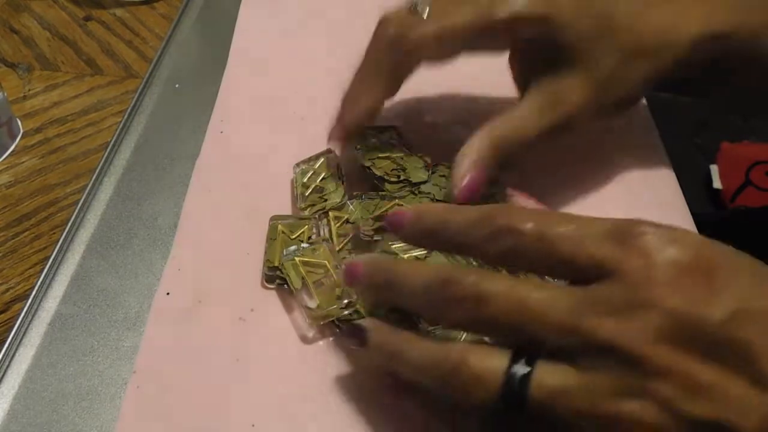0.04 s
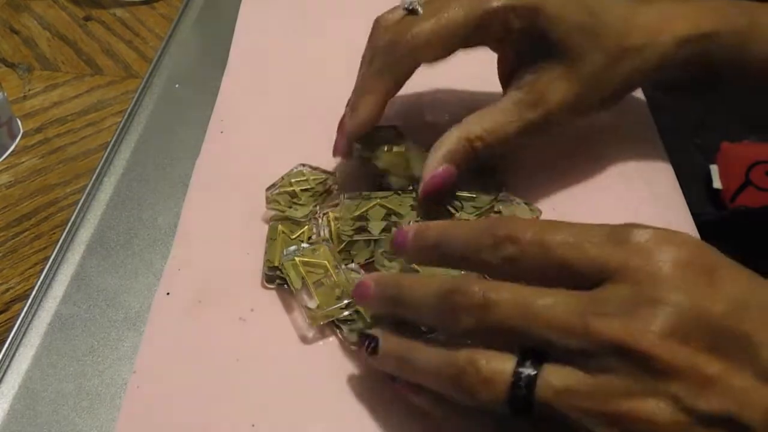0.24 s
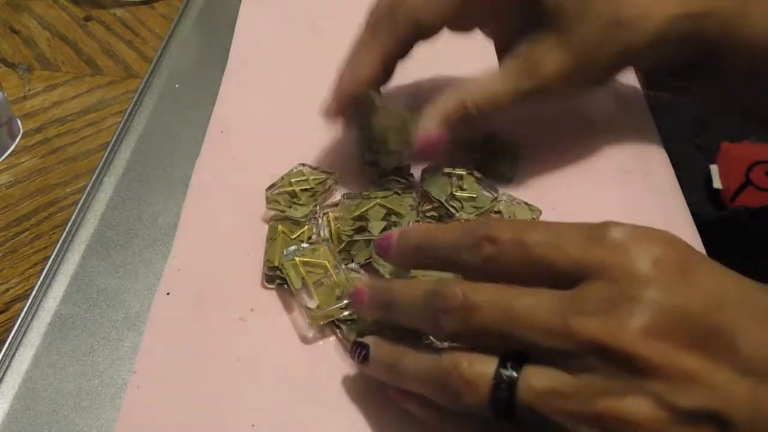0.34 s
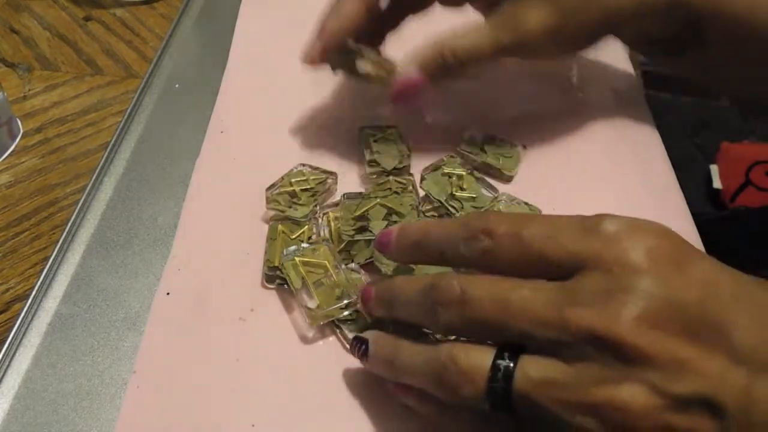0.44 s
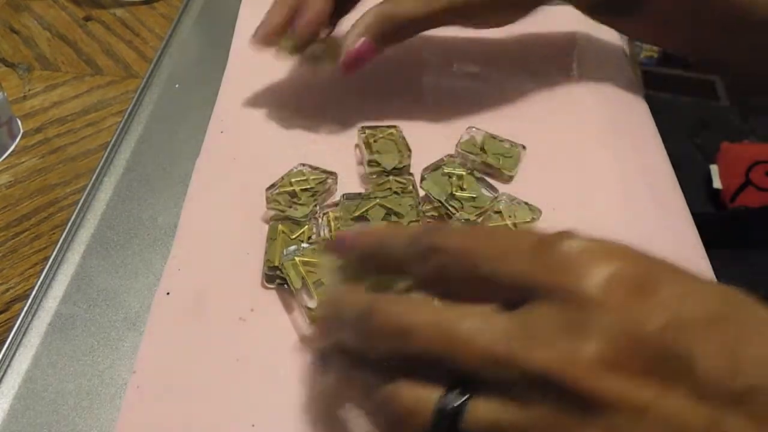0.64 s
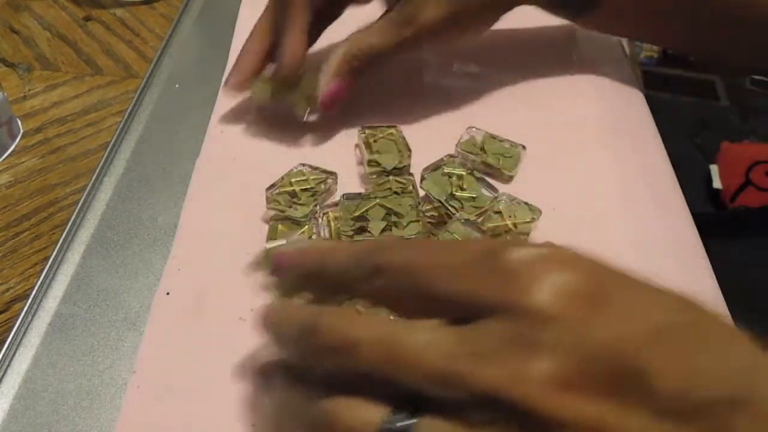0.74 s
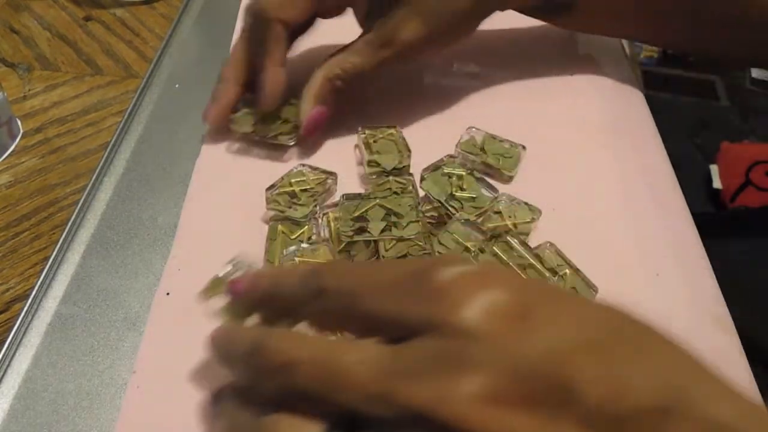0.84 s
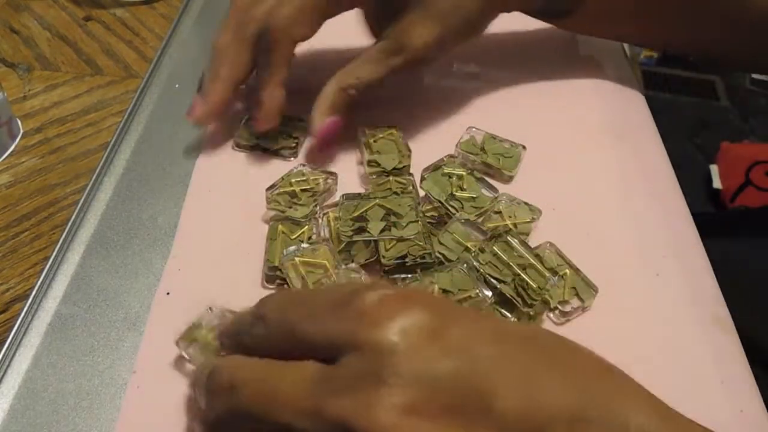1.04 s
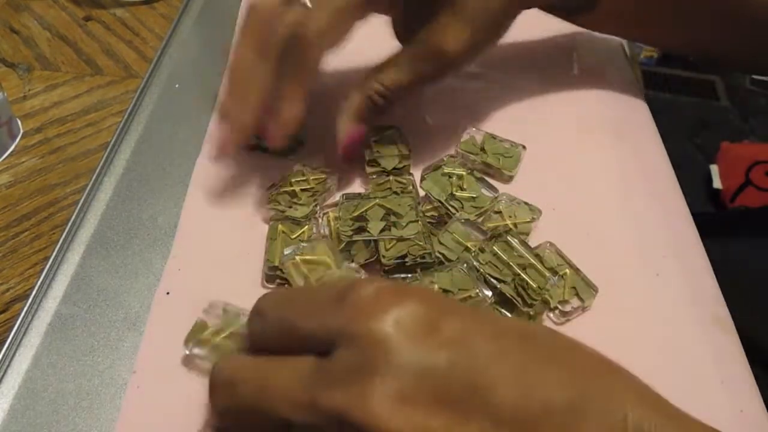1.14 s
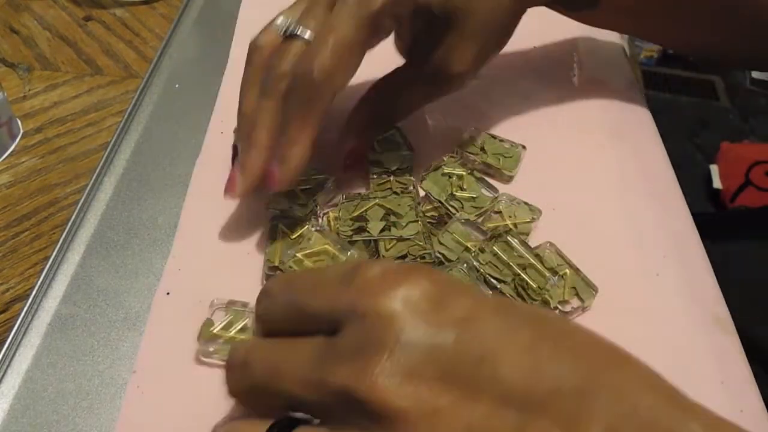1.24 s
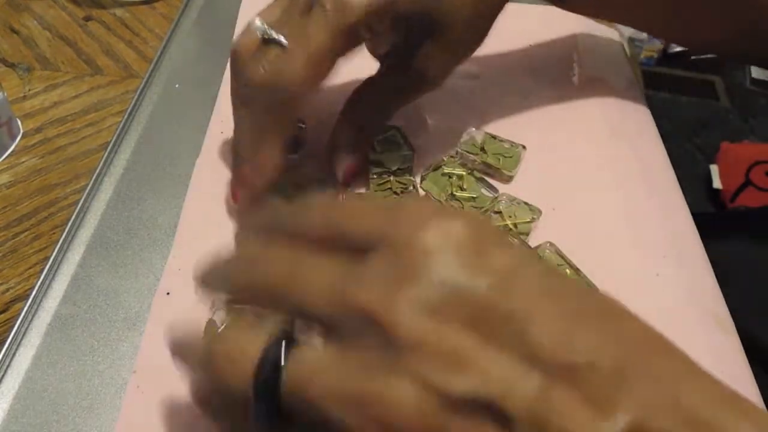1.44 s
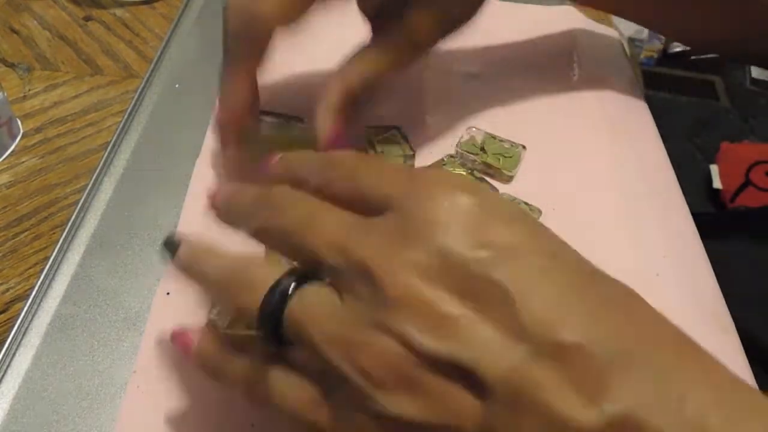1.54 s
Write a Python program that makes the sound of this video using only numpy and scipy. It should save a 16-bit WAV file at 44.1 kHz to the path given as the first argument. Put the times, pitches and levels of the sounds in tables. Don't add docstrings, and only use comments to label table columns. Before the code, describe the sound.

Small hard stones clatter and knock on a padded table, close up, over steady low air hum.

```python
import sys
import numpy as np
from scipy import signal
from scipy.fft import rfft, irfft
from scipy.io import wavfile
from scipy.ndimage import uniform_filter1d

SR = 44100
rng = np.random.default_rng(int(sys.argv[2]) if len(sys.argv) > 2 else 0)


def unload_audio(sound):
    columns = np.transpose(np.atleast_2d(sound))
    steps = np.round(np.clip(columns, -1, 1) * 32767)
    wavfile.write(sys.argv[1], SR, steps.astype(np.int16))


def boost(x):
    u = np.asarray(x, float) / 20
    return 10 ** u


N = 70560


def curve(table, hz):
    table = np.array(table, float)
    return np.interp(np.log(hz), np.log(table[:, 0] + 1), table[:, 1])


def band(x, hz, width):
    edges = np.clip([hz - width / 2, hz + width / 2], 10, SR / 2 - 500)
    return signal.sosfilt(signal.butter(2, edges, "band", fs=SR, output="sos"), x)


def unit(x):
    return x / np.sqrt(np.mean(x ** 2))


def smooth_twice(x, first, second):
    return uniform_filter1d(uniform_filter1d(x, first), second)


def walk(rate):
    hold = int(SR / rate)
    steps = np.repeat(rng.standard_normal(N // hold + 1), hold)
    return unit(smooth_twice(steps, hold, hold)[:N])


def decay(t, t60):
    return np.exp(-np.log(1000) * t / t60)


LONGEST_T60_S = .18
RATTLE_HZ, RATTLE_WIDTH_HZ, RATTLE_T60_S = 1824, 2750, .18


def ring(start, hz, db, t60, pan_db, push=.1, rattle_db=-200):
    t = np.arange(int(.25 * SR)) / SR
    t60 = np.clip(t60, .001, LONGEST_T60_S)[:, None]
    modes = np.sin(2 * np.pi * hz[:, None] * t) * decay(t, t60)
    sign = (-1) ** (np.arange(len(hz)) // 3)
    sides = boost(np.array([pan_db, -pan_db]) / 2)
    pair = (sign * boost(db) * sides) @ modes

    noise = rng.standard_normal((3, len(t)))
    rattle = band(noise[0] + 0.96 * noise[1:], RATTLE_HZ, RATTLE_WIDTH_HZ)
    pair = pair + boost(rattle_db) * rattle * decay(t, RATTLE_T60_S)

    a = np.exp(-2 / push)
    pair = signal.lfilter([(1 - a) ** 2], [1, -2 * a, a * a], pair)
    out = np.zeros((2, N))
    i = int(start * SR)
    out[:, i:i + len(t)] = pair[:, :N - i]
    return out


# (frequency [Hz], level [dB per Hz])
AIR_SPECTRUM = [(45, -5), (90, -3), (220, -6), (650, -3.5), (1300, -6.5), (2500, -16.5), (5000, -30),
                (16000, -38)]
# (frequency [Hz], side minus mid [dB])
AIR_WIDTH = [(60, -12), (250, -9.5), (700, -7.5), (1300, -3), (2400, -0.5), (8000, 1), (15000, 3)]
AIR_DB, SWELL_DB, FLICKER_DB = -57.5, .4, 1.2


def air():
    f = np.maximum(np.arange(N // 2 + 1) * SR / N, 1)
    mid, side = rfft(rng.standard_normal((2, N))) * boost(curve(AIR_SPECTRUM, f))
    side = side * boost(curve(AIR_WIDTH, f))
    swell = walk(1.33)
    out = 0
    for hz in 20 * 2 ** np.arange(0, 10.1, .5):
        weight = np.clip(1 - np.abs(2 * np.log2(f / hz)), 0, 1)
        flicker = walk(12.25) * (hz < 3000)
        sway = boost(SWELL_DB * swell + FLICKER_DB * flicker)
        out = out + sway * irfft(np.array([mid, side]) * weight, N)
    mid, side = out / np.sqrt(np.mean(out[0] ** 2)) * boost(AIR_DB)
    return np.array([mid + side, mid - side]) * boost(np.array([[.4], [-.4]]))


# (time [s], level [dB], pitch [Hz], ring [ms])
TOUCHES = [(0.086, -38, 3440, 3.9), (0.118, -37.5, 5300, 2.6), (.1765, -56, 2600, 3.3),
           (.1492, -49, 11800, 1.4), (.1545, -29.5, 11300, 0.99), (.2, -48, 6950, 3.4),
           (0.2048, -38, 2750, 7.2), (0.2203, -36, 2380, 5.6), (0.2325, -39, 7900, 1.9),
           (.278, -49.5, 4900, 2.5), (.528, -45, 4000, 4.7), (.831, -56, 9100, 2.8),
           (0.855, -46.5, 4000, 2.8), (0.92, -55, 6720, 4), (.967, -50.5, 4700, 3),
           (1.001, -45.5, 4530, 8.6), (1.012, -49, 8600, 3), (1.034, -52, 8000, 3), (1.203, -45, 2500, 2.4),
           (1.21, -42.5, 2120, 6.5), (0.1494, -26.5, 2650, 1.2), (0.1539, -30.5, 2800, 6)]
# (ratio to pitch [1], level [dB])
STONE_OVERTONES = [(.8, 10), (1, 13.5), (1.2, 2), (1.45, -34), (1.71, -21), (2, -13), (2.4, -32),
                   (3.1, -28)]
TICK_DB, CRUNCH_DB = -29, -4
CRUNCH_REACH = 1.7


def ticks():
    ratio, db = np.array(STONE_OVERTONES, float).T
    chance = rng.standard_normal((len(TOUCHES), 3, len(ratio)))
    noise = rng.standard_normal((3, N))
    noise = noise[0] + 1.3 * noise[1:]
    out = 0
    for (start, level, hz, ms), (detune, uneven, pan) in zip(TOUCHES, chance):
        modes_hz = np.minimum(hz * ratio * (1 + .05 * detune), 15500)
        t60 = 2.5 * ms / 1000 / np.sqrt(ratio)
        out = out + ring(start, modes_hz, level + TICK_DB + db + 3 * uneven, t60, 3 * pan)

        u = np.maximum(np.arange(N) / SR - start, 0) / (0.17 * ms / 1000)
        edges = [.5 * hz, min(CRUNCH_REACH * hz, 20000)]
        crunch = unit(signal.lfilter(*signal.butter(1, edges, "band", fs=SR), noise))
        out = out + boost(level + CRUNCH_DB) * np.sqrt(u) * np.exp(-u) * crunch
    return out


# (time [s], level [dB], contact [ms], upper modes [dB], share of the free ring time [1])
LANDINGS = [(.0865, -41.5, 1.04, 4, .9), (.0915, -46.5, 0.45, -16, 0.57), (.107, -50.5, 0.32, -7, 1),
            (.158, -42.5, 0.077, -4, 0.63), (.1745, -43, 0.1, -2.5, 1.1), (.1788, -32, 0.31, -0.5, 0.43),
            (.206, -57, 0.096, 3, .7), (.2115, -41.5, .44, 3.5, 1.5), (0.2202, -33, 0.18, 0.5, 0.59),
            (.227, -29, 0.96, 13.5, .9), (.2318, -41.5, 0.16, 2.5, 1.35), (.238, -26, 0.66, -1, 0.5),
            (.2465, -50, 0.35, 3, 1), (.2545, -47, 0.49, 2, 1.46), (.355, -51, 0.056, -6.5, 0.41),
            (.4225, -42, 0.31, 4, .9), (.429, -31.5, 0.55, 3, 1), (.53, -44.5, .4, -1, 0.82),
            (.597, -56.5, 0.57, 15.5, 0.97), (.8187, -34.5, 0.94, 0, 1.5), (.830, -40.5, 0.24, -6, 0.5),
            (.907, -55, 0.18, 1, .9), (.9195, -43, 0.7, 0, 0.82), (.9678, -29, 0.67, -3, 0.74),
            (.9725, -34, 0.41, 5, 1.1), (.9765, -36.5, 0.55, -0.5, 2.1), (.982, -28, 0.84, 0, 0.58),
            (1.0035, -26.5, 0.51, 5, 0.61), (1.009, -27.5, 0.54, -1, 0.33),
            (1.0145, -22.5, 0.54, -0.5, 0.72), (1.031, -50, 0.74, 7, 1.2), (1.081, -44.5, 0.42, -5.5, 0.75),
            (1.168, -32, 1.3, -1.5, 0.77), (1.203, -18.5, 0.57, 2.5, 0.38), (1.2075, -20.5, 0.67, 9, 0.54),
            (1.2135, -21.5, 0.63, -5, 0.93), (1.2232, -35.5, 0.36, -3, 1.7),
            (1.2308, -23, 1.08, -0.5, 0.52), (1.2495, -35.5, 1.1, -9.5, 0.69)]
# (frequency [Hz], level [dB], t60 [s], left minus right [dB])
TABLE_MODES = [(209, -16.5, 0.11, -0.5), (248.4, -20.5, 0.14, 1), (380, -8, 0.071, -5.5),
               (460, -3.5, 0.027, -8), (477, 0.5, 0.055, 1.5), (504.2, 0, 0.11, 4.5),
               (616, -9.5, 0.041, -12.5), (752, 5, 0.053, 0.5), (788.6, 4.5, 0.078, 3),
               (887.4, 3, 0.051, 3), (1080, -1.5, 0.013, 3.5), (1185, -4.5, 0.085, 9),
               (1462, -10, 0.049, 14.5), (1982, -1.5, 0.032, 6)]
KNOCK_DB, PLACE_DB, RATTLE_DB = -7, 2.5, -3.5
SPLIT_HZ = 668


def knocks():
    hz, db, t60, pan = np.array(TABLE_MODES, float).T
    places = rng.standard_normal((len(LANDINGS), len(hz)))
    upward = np.tanh((hz - SPLIT_HZ) / 100)
    out = 0
    for (start, level, ms, upper, free), place in zip(LANDINGS, places):
        modes_db = db + KNOCK_DB + level + PLACE_DB * place + upper * upward
        push = max(ms, .02) * SR / 1000
        out = out + ring(start, hz, modes_db, t60 * free, pan, push, level + RATTLE_DB)
    return out


ROOM_DB, ROOM_T60_S, ROOM_TREBLE_T60_S, ROOM_HZ = -10.5, 0.13, 0.068, 2500
ROOM_LIKE, ROOM_RISE_S = .88, .003


def room(x):
    t = np.arange(int(.4 * SR)) / SR
    shared, apart = rng.standard_normal((2, len(t)))
    echoes = np.sqrt(1 + ROOM_LIKE) * shared + np.sqrt(1 - ROOM_LIKE) * apart * np.array([[1], [-1]])
    low = signal.lfilter(*signal.butter(1, ROOM_HZ, fs=SR), echoes)
    tail = low * decay(t, ROOM_T60_S) + (echoes - low) * decay(t, ROOM_TREBLE_T60_S)
    tail = tail * (1 - np.exp(-t / ROOM_RISE_S))
    tail = tail * boost(ROOM_DB) / np.sqrt(np.sum(tail[0] ** 2))
    return signal.fftconvolve(x.mean(axis=0)[None], tail, axes=1)[:, :N]


# (start [s], end [s], level [dB])
DRAGS = [
    (0.113, 0.28, -50),
    (0.5, 0.637, -79),
    (0.845, 1.138, -55),
    (1.18, 1.407, -59),
]
SLIDE_HZ, SLIDE_WIDTH_HZ = 635, 480
BUMPS_PER_S, BUMP_SCATTER_DB = 600, 2.5


def slides():
    t = np.arange(N) / SR
    hits = rng.random(N) < BUMPS_PER_S / SR
    bumps = hits * rng.standard_normal(N) * boost(BUMP_SCATTER_DB * rng.exponential(1, N))
    shape = 0
    for start, end, db in DRAGS:
        shape = shape + boost(db) * np.sin(np.pi * np.clip((t - start) / (end - start), 0, 1))
    return shape * unit(band(bumps, SLIDE_HZ, SLIDE_WIDTH_HZ)) * boost(np.array([[1.], [-1.]]))


# (time [s], level [dB], pitch [Hz], t60 [ms])
CLEAR_RINGS = [(.1492, -46, 3800, 4.2), (0.1487, -41, 4800, 5), (0.1498, -46, 7500, 4.7),
               (.1492, -49, 11640, 5.3), (.1492, -50, 15000, 3), (.1545, -38, 3860, 7.5),
               (.1545, -41.5, 6400, 6.3), (0.155, -36.5, 7370, 5.9), (.1545, -40, 11940, 5.8),
               (.1545, -47, 14800, 3.7), (0.2193, -40, 2500, 8.5), (0.2306, -44.5, 2800, 11),
               (0.2305, -50, 4800, 9.4), (.2315, -51.5, 9290, 5), (.9195, -65.5, 6900, 18),
               (.967, -64, 5330, 15), (.9997, -53, 3300, 18), (0.9991, -45.5, 3950, 16),
               (1.0007, -54, 5220, 20), (.9997, -63, 6800, 18), (1.035, -60, 3420, 15),
               (1.2129, -33.5, 1930, 12), (1.2116, -44.5, 2650, 17)]


def pings():
    pans = 5 * rng.standard_normal((len(CLEAR_RINGS), 1))
    out = 0
    for (start, db, hz, ms), pan in zip(CLEAR_RINGS, pans):
        out = out + ring(start, np.array([hz]), db, np.array([ms / 1000]), pan)
    return out


CHIRP_LEN_S, CHIRP_HZ, CHIRP_WIDTH_HZ = .07, 11550, 350
CHIRP_TIMES = [.33, .83, 1.335]
CHIRP_LEVELS = [-80, -82, -79]


def insect():
    t = np.arange(N) / SR
    gate = 0
    for start, db in zip(CHIRP_TIMES, CHIRP_LEVELS):
        to_edge = np.minimum(t - start, start + CHIRP_LEN_S - t)
        gate = gate + boost(db) * np.clip(to_edge / 0.006, 0, 1)
    return gate * unit(band(rng.standard_normal((2, N)), CHIRP_HZ, CHIRP_WIDTH_HZ))


# (frequency [Hz], level [dB], t60 [s], left minus right [dB])
CLACK_MODES = [(244, -31, 0.044, 4), (476, -2.5, 0.061, -1), (721, -2.5, 0.067, 6), (838, 2.5, 0.059, 1),
               (1103, 1.5, 0.019, 7), (1191, -5, 0.22, 2), (1512, -24, 0.32, 21.5), (1729, -16, 0.27, 5),
               (1915, -7.5, 0.079, 8), (2268, -15, 0.099, -21), (2650, -10, 0.069, 7), (2654, -12, 0.13, 4),
               (3120, 15.5, 0.0049, -5), (509, -16, .17, 10)]
CLACK_S, CLACK_DB, CLACK_RATTLE_DB = .3918, -19.5, -15.5
SPRAY_DB, SPRAY_T60_S, SPRAY_HZ = -47.5, 0.092, 4000


def clack():
    hz, db, t60, pan = np.array(CLACK_MODES, float).T
    strike = ring(CLACK_S, hz, db + CLACK_DB, t60, pan, 6.6, CLACK_RATTLE_DB)
    u = np.arange(N) / SR - CLACK_S
    hiss = band(rng.standard_normal((2, N)), 9500, 13000)
    hiss = signal.lfilter(*signal.butter(1, SPRAY_HZ, fs=SR), hiss)
    shape = np.clip(u / 0.0022, 0, 1) * decay(np.abs(u), SPRAY_T60_S)
    return strike + boost(SPRAY_DB) * unit(hiss) * shape


LOW_CUT_HZ, TICK_ROOM_DB = 170, -0.5


def scene():
    low_cut = signal.butter(4, LOW_CUT_HZ, "high", fs=SR, output="sos")
    wood = signal.sosfilt(low_cut, knocks() + slides() + clack())
    small = ticks() + pings()
    return air() + wood + small + room(wood + boost(TICK_ROOM_DB) * small) + insect()


def roll_off(x):
    return signal.sosfilt(signal.butter(12, 16530, fs=SR, output="sos"), x)


HAZE_DB, HAZE_S, HAZE_LOW_HZ = -35.5, 0.041, 2960
TOP_HZ = 15700


def record(dry):
    k = int(HAZE_S * SR)
    loud = np.sqrt(np.abs(smooth_twice(np.mean(dry ** 2, axis=0), k, k // 2)))
    hiss = band(rng.standard_normal((2, N)), 8000 + HAZE_LOW_HZ / 2, 16000 - HAZE_LOW_HZ)
    haze = boost(HAZE_DB) * loud * unit(hiss)
    top_cut = signal.ellip(6, .3, 25, TOP_HZ, fs=SR, output="sos")
    mix = signal.sosfilt(top_cut, dry + haze)
    return roll_off(mix)


dry = scene()
out = record(dry)
unload_audio(out)
```